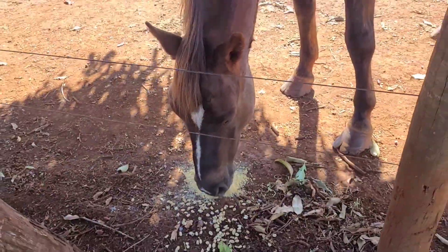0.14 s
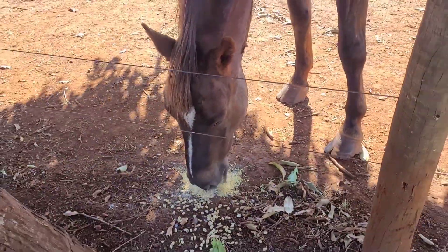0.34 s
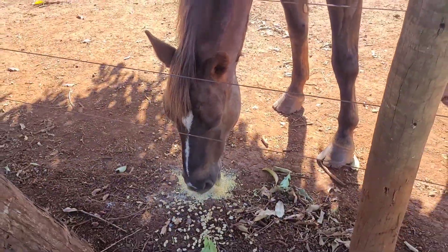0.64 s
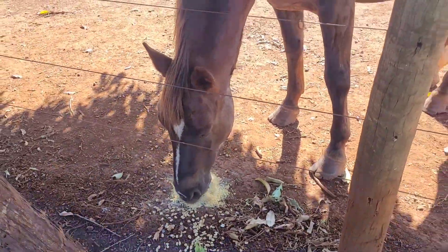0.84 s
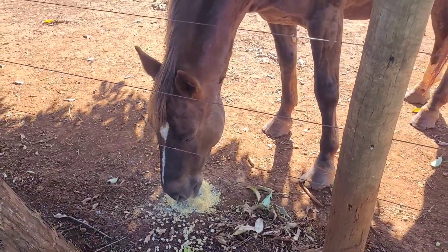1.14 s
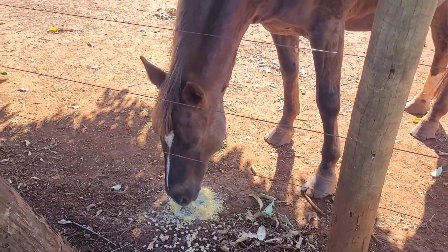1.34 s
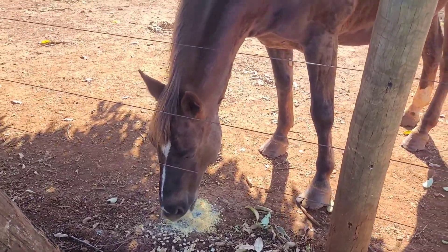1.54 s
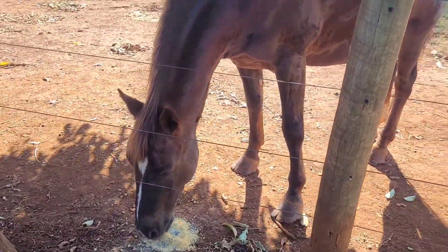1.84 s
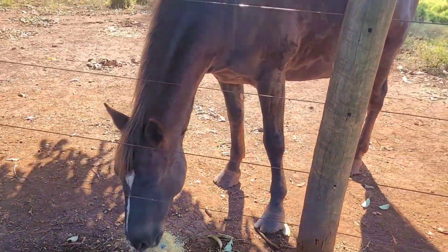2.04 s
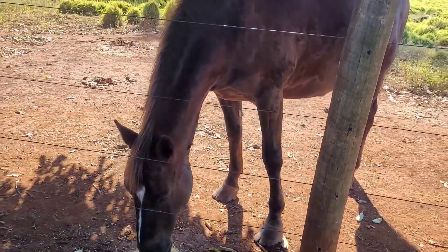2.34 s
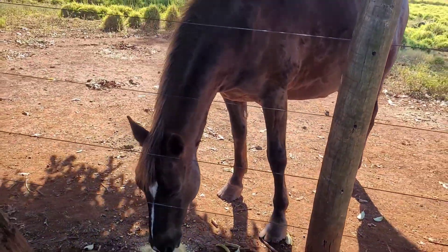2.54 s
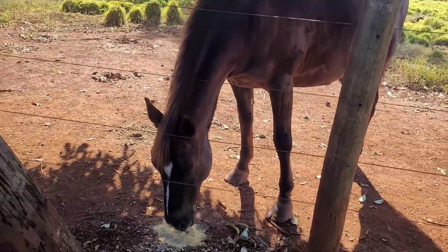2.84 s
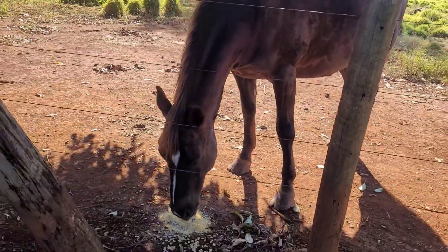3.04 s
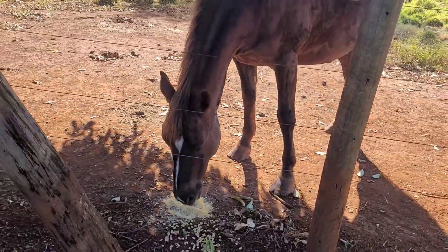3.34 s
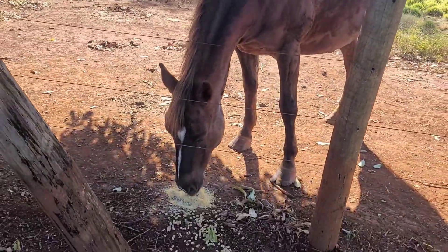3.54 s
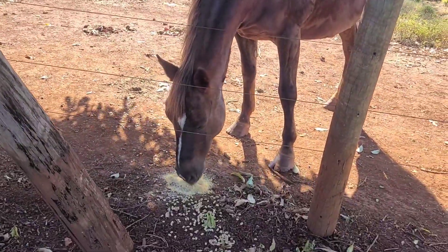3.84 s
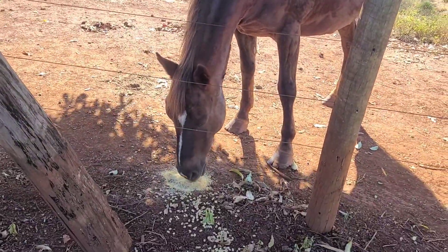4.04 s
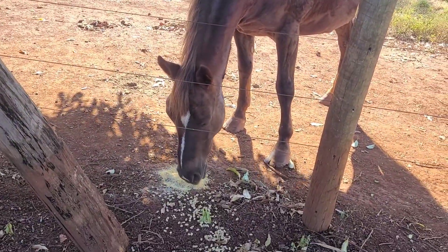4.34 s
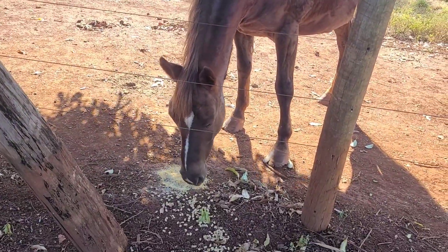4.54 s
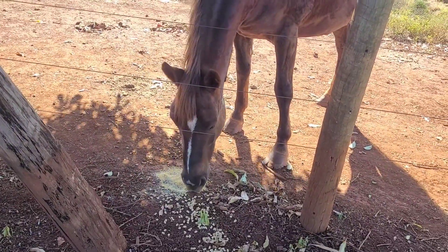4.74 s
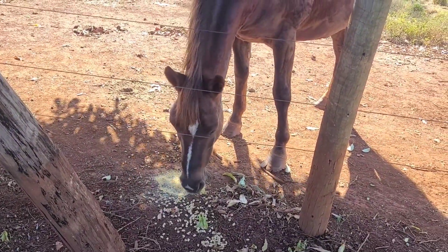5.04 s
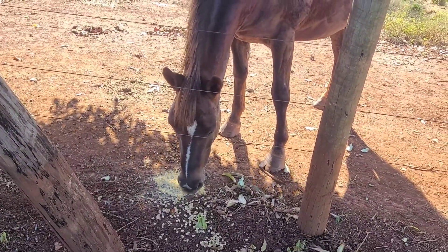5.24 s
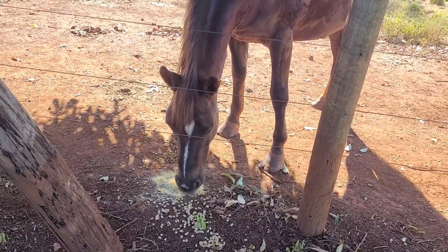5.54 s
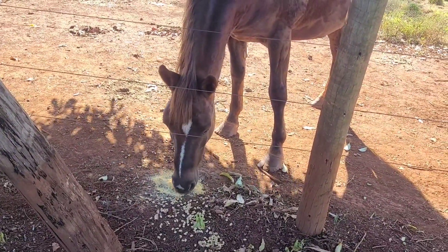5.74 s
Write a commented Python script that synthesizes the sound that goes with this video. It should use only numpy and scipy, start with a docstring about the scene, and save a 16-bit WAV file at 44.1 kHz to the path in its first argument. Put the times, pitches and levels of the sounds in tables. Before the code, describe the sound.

An open-air stereo scene with wind blowing right across the microphone. Low rumble, flutter and short thumps come unevenly, heavier on the left: a hard slap at about 0.16 s, strong buffets around 0.3 to 0.6 s, frequent bumps until about 2.2 s, a lull near 3 s, a burst near 3.6 s, then dense buffeting from 4.6 s to the end. A few metres off, a horse grinds dried corn. A loud crack snaps at 0.16 s, a bright, gritty cluster at 0.8 to 0.9 s, another crack at 1.25 s; small crackles follow near 1.75 s, crunches at 2.6 s and a duller crack at 3.24 s, then quieter, sparser munching. Faint birds chirp early, trill softly around 1.6 to 2.1 s, chirp more at 2.9 to 3.7 s, and add rising notes on the right at 4.7 to 4.9 s and a trill at 5.2 s. Thin leaf hiss continues throughout, without voices.

```python
"""Wind rumbles and flutters at two microphone ports over a steady distant hiss of leaves; a horse, a few metres
off, gathers dried corn from dusty ground and cracks it between its teeth, while birds call now and then.
Wind is shaped noise, nearly separate in each port, with short damped swings for eddies; leaves are partly
correlated noise. Grinding is dense random clicks, cracks are struck modes, and bird calls are gliding sines.
Small delays between the ports place the horse and birds; random tails scatter the cracks and echo the calls."""
import sys
import numpy as np
from scipy import signal
from scipy.fft import rfft, irfft, next_fast_len
from scipy.io import wavfile
from scipy.ndimage import uniform_filter1d, map_coordinates

SR = 44100
rng = np.random.default_rng(int(sys.argv[2]) if len(sys.argv) > 2 else 0)


def store_wav(level_fs):
    """Save 16-bit WAV to argv[1]."""
    pcm = np.round(np.clip(np.atleast_2d(level_fs), -1, 1) * 32767)
    wavfile.write(sys.argv[1], SR, pcm.T.astype(np.int16))


N = 259749
PADDED = next_fast_len(N)

# All levels are relative; "pan" is left minus right port.
# Wind rumble beneath the buffets, rising and sinking: [t/s, level/dB]
RUMBLE_LEVEL = [(0.0, -44.5), (0.34, -32.5), (0.89, -33), (1.18, -33), (1.35, -38), (1.69, -33), (3.2, -48),
                (3.71, -35), (3.9, -38.5), (4.17, -41.5), (4.77, -29), (5.12, -38.5), (5.48, -31),
                (5.89, -59)]
# Wind flutter above 140 Hz: [t/s, level/dB, pan/dB]
FLUTTER_LEVEL = [(0.0, -43, 16.5), (0.13, -46.5, -1), (0.16, -27.5, -13), (0.2, -31.5, 0.5),
                 (0.8, -40.5, 4.5), (1.61, -38.5, -0.5), (1.66, -28, 2.5), (1.84, -46.5, 1),
                 (1.97, -30, 2.0), (2.33, -51.5, 4.5), (2.74, -52.5, -11), (2.94, -63.5, -3),
                 (3.46, -60, -4), (3.56, -26, -5.5), (3.59, -40, -5), (3.76, -37.5, -4.5), (3.8, -48.5, 5),
                 (4.45, -46.5, -3), (4.76, -36, -1.5), (5.02, -37, 2.5), (5.05, -45, 7.5), (5.32, -29, 1),
                 (5.77, -35, 3), (5.89, -52, 10)]
# Buffets that swell the wind: [peak t/s, peak level/dB, half width/s, pan/dB]
BUFFETS = [(.05, -38.5, 0.035, 21), (.18, -30.5, 0.032, 0), (0.34, -18.5, 0.026, 8.5),
           (0.552, -13.5, 0.0097, -5), (0.631, -21.5, 0.016, 13), (.803, -37, 0.063, -5),
           (.958, -27, 0.016, 10), (1.05, -26.5, 0.054, 3), (1.177, -23.5, 0.085, 5.5),
           (1.28, -28.5, 0.063, 10), (1.556, -28.5, 0.065, 5), (1.646, -27.5, 0.034, 13),
           (1.74, -22.5, 0.02, 2), (1.85, -28.5, 0.037, 11), (1.964, -17.5, 0.032, 1),
           (2.065, -34, 0.019, 7), (2.145, -26.5, 0.024, 7), (2.395, -34, 0.013, -5),
           (2.544, -32.5, 0.058, 16), (2.674, -28, 0.095, 4), (2.844, -29, 0.011, 0),
           (3.043, -37.5, 0.021, -5), (3.258, -29, 0.042, 6), (3.558, -32.5, 0.08, 15),
           (3.712, -20, 0.01, -2), (4.082, -24, 0.013, -11.5), (4.171, -29, 0.037, 0),
           (4.345, -27.5, 0.018, 9.5), (4.608, -22, 0.017, -4), (4.7, -19.5, 0.011, -5),
           (4.894, -27, 0.017, 18), (5.002, -23, 0.016, 3.5), (5.102, -27.5, 0.033, 2),
           (5.201, -29.5, 0.012, 24), (5.278, -24.5, 0.012, 15), (5.378, -24, 0.027, 12),
           (5.517, -20.5, 0.038, 10), (5.69, -23, 0.043, 2.5), (5.82, -30, 0.031, 23.5)]
# Spectra of wind rumble and wind flutter: [f/Hz, level/dB per Hz]
RUMBLE_SPECTRUM = [(8.8, -11), (15, -59), (43, 5.5), (59, 6.5), (151, -3), (183, -13), (200, -10.5),
                   (260, -41), (440, -120)]
FLUTTER_SPECTRUM = [(71, -57), (120, -17), (155, 2), (187, -7), (248, 1), (577, -26), (1000, -48),
                    (1300, -53), (2200, -120)]
GUST_PAN_DB = 10  # the left port is the windward one
BUFFET_FLUTTER_DB = -15.5  # flutter that a buffet brings along
WIND_SHARED = 0.51  # amplitude of the noise common to both ports, against 1 for each port's own

# Spectrum of distant leaves: [f/Hz, level/dB per Hz]
LEAVES_SPECTRUM = [(180, -50), (300, -11), (355, -15.5), (522, -19), (970, -17.5), (2440, -17.5),
                   (4240, -13.5), (5640, -17), (7380, -15.5), (9330, -27.5), (12600, -28.5), (13700, -38),
                   (15400, -40), (16500, -67)]
# Likeness of the leaf hiss in the two ports: [f/Hz, correlation/1]
LEAVES_CORRELATION = [(300, .6), (600, .4), (900, .15), (1300, -.15), (2000, -.08), (3000, .05), (6000, .0)]
# Balance of the leaf hiss: [f/Hz, pan/dB]
LEAVES_PAN = [(300, -4.5), (700, -3.5), (1300, 2), (2400, -0.8), (4400, 2.5), (6500, -3.5), (9000, -0.8),
              (15000, -1)]
LEAVES_DB = -50.5

# Strokes of the teeth: [peak t/s, rise/s, fall/s, grit level/dB, crunch level/dB, fizz minus grit/dB]
STROKES = [(.02, 0.0089, 0.21, -63, -62, 1), (.148, 0.16, 0.14, -47.5, -46.5, -5),
           (.32, 0.2, 0.1, -53.5, -50, -3), (.54, 0.035, 0.18, -63, -52, 0), (.68, 0.1, .12, -62.5, -58, 0),
           (0.803, 0.0071, 0.026, -39, -55, -4), (.816, 0.0092, 0.011, -33.5, -38.5, -4),
           (.84, 0.062, 0.04, -44, -45.5, -14), (0.856, 0.0074, 0.037, -37.5, -51, -7),
           (.88, 0.022, 0.01, -39, -55, -7), (.895, .01, 0.069, -50, -50.5, 2),
           (.945, 0.012, .2, -51, -67, -3), (1.076, .1, 0.05, -57, -48, 1),
           (1.19, 0.17, 0.093, -54.5, -54, -12), (1.28, 0.059, 0.086, -49.5, -49.5, -7),
           (1.355, 0.093, 0.036, -45.5, -52.5, -11.5), (1.53, 0.059, 0.16, -60, -54.5, -4),
           (1.63, 0.011, .25, -49.5, -48.5, -5), (1.864, 0.036, 0.9, -51.5, -54.5, -10),
           (2.048, .1, 0.092, -62, -68, -3), (2.248, 0.14, 0.098, -71, -69, -5),
           (2.388, 0.025, 0.044, -61, -71, -5), (2.57, .015, 0.11, -52.5, -50, 1.5),
           (2.625, .04, 0.092, -57, -47, 1), (2.785, .02, 0.024, -48.5, -50, -18),
           (2.855, 0.11, .06, -57, -57.5, -4), (2.944, 0.018, 0.12, -59, -60, 4),
           (3.24, .004, .03, -53, -43.5, -18), (3.32, .08, 0.22, -62, -55, -5),
           (3.6, 0.19, .09, -55.5, -62, -19), (3.7, 0.012, 0.035, -51.5, -71, -28),
           (3.89, 0.018, .06, -57, -64, -11), (4.6, 0.023, 0.021, -57, -65, -22),
           (4.81, 0.14, 0.6, -56.5, -57, -12), (5.52, 0.85, 0.87, -56.5, -58, -16),
           (5.77, .04, 0.12, -58, -58, -6.5)]
# Spectra of splintering grit, its finest fizz and duller crunch: [f/Hz, level/dB per Hz]
GRIT_SPECTRUM = [(1650, -54), (2800, -5.5), (3380, 6.5), (3890, 5.5), (4960, 7), (5620, 4), (6120, 1),
                 (7100, 4.5), (9200, -5.5), (12000, -38), (20200, -120)]
FIZZ_SPECTRUM = [(5290, -41), (9000, -14), (10600, 2.5), (11800, 1), (13400, -2.5), (16000, -8.5)]
CRUNCH_SPECTRUM = [(240, -52), (400, -1.5), (604, -9), (738, -8), (1850, -9.5), (3110, -8), (5000, -31),
                   (6500, -58), (11000, -120)]
# The microphone swings round towards the horse: [t/s, delay of the left port/ms]
HORSE_LAG = [(0, .15), (1.9, .14), (2.55, .05), (3.2, .02), (5.89, 0)]
STROKE_DROP_DB = 12  # lost over a rise or a fall time
MUNCH_DB = -69.5  # dull crunch that never quite stops

# Kernels cracking: [t/s, peak level/dB, strongest f/Hz, loss away from it/dB per octave]
CRACKS = [(.048, -37.5, 3500, 5.5), (0.135, -29, 3800, 29), (.161, -11, 2650, 21.5), (.33, -29.5, 1120, 8),
          (.465, -48, 13000, 20), (.562, -38, 12500, 6), (0.639, -50, 13500, 14), (.667, -52, 13500, 9),
          (.802, -32, 5500, 6), (.818, -16.5, 3970, 20), (0.853, -27.5, 5100, 4.5), (.872, -39, 4000, 5),
          (0.882, -20.5, 6760, 13), (.942, -37.5, 6500, 2), (.97, -31.5, 6600, 5), (.995, -29.5, 8300, 9),
          (1.081, -42, 9000, 5), (1.246, -26, 3060, 31), (1.627, -42, 1710, 7), (1.736, -41, 6000, 9),
          (1.758, -33.5, 6500, 12), (1.776, -42, 8000, 5), (1.836, -43, 7500, 4), (1.859, -36, 7000, 13),
          (1.876, -38, 8000, 5), (2.027, -40, 9000, 5), (2.048, -46, 6500, 1), (2.32, -47, 12000, 0.5),
          (2.405, -40, 6000, 14), (2.563, -39, 3000, 4), (2.566, -34.5, 930, 13), (2.598, -36, 1500, 4),
          (2.62, -35, 1800, 5), (2.624, -34, 1100, 8), (2.639, -39, 2000, 9), (2.659, -39.5, 1800, 12),
          (2.771, -37.5, 4000, 3.5), (2.778, -34, 1100, 4), (2.856, -45, 1100, 9), (3.239, -27, 1010, 6),
          (3.248, -29.5, 1500, 10), (3.321, -53, 800, 0), (3.364, -41, 1790, 4), (4.798, -37.5, 2300, 6),
          (5.155, -37, 2640, 40), (5.543, -35, 900, 5.5), (5.812, -37.5, 1990, 7.5)]
# Modes of a cracking kernel: [f/Hz, level/dB, decay time t60/s]
KERNEL_MODES = [(604, 5, 0.016), (927, 1.5, 0.0089), (1120, -11.5, 0.018), (1260, 3.5, 0.0092),
                (1580, 12, 0.0027), (2120, 7.5, 0.0072), (2520, -2.5, 0.0036), (3220, 9, 0.0019),
                (3640, 9, 0.0027), (4190, 9, 0.0071), (5900, 5, 0.0043), (7550, 12, 0.0022),
                (11300, 7, 0.0053), (12700, 7, 0.0028)]
# Rough ground and legs scatter each crack: [delay/s, level/dB per ms]
GROUND_SCATTER = [(.0002, 10), (.002, -13.5), (.012, -22)]
CRACK_CHANCE_DB = 2.2  # spread of a mode's strength from crack to crack

# Single eddies that slap a port: [t/s, peak level/dB, f/Hz, pan/dB]
SLAPS = [(0.163, -2, 230, 1), (0.31, -16, 323, -6), (0.382, -16, 251, -2), (0.537, -14.5, 136, 0),
         (0.826, -18, 197, -2), (1.312, -16.5, 147, 1), (1.573, -15.5, 123, 2), (1.652, -16.5, 112, 4),
         (1.972, -19, 185, 2), (2.053, -18.5, 163, 9.5), (2.137, -21.5, 104, -19.5),
         (3.506, -33, 122.6, 13), (3.544, -16.5, 143, 11.5), (3.661, -21, 149, 13), (4.602, -14, 260, 3.5),
         (4.702, -16.5, 205, 6), (4.891, -13, 120, 9.5), (4.949, -21, 131, -8), (4.99, -22.5, 115, -9),
         (5.263, -11, 140, -6.5), (5.316, -15.5, 140, -6), (5.395, -15.5, 164, -6), (5.513, -9.5, 207, 3),
         (5.621, -19.5, 115, 12), (5.777, -27.5, 110, 23)]

# Chirps of the birds ahead, and distinct echoes of the first two:
# [start t/s, length/s, first f/Hz, middle f/Hz, last f/Hz, level/dB]
CHIRPS = [(.268, .036, 2400, 2130, 1850, -45), (.312, .022, 2050, 2050, 1950, -50),
          (.543, .045, 2900, 2280, 1850, -48), (.595, .022, 2150, 2080, 1950, -51),
          (.885, .07, 2850, 1950, 1650, -54), (2.383, .017, 6050, 6100, 6200, -49),
          (2.445, .05, 5850, 5880, 5900, -50), (2.87, .07, 3450, 3030, 2920, -48),
          (3.015, .08, 4300, 3500, 2840, -49), (3.098, .08, 3330, 3580, 3580, -46),
          (3.105, .024, 7150, 7220, 7050, -50), (3.31, .075, 3200, 3700, 3680, -48),
          (3.575, .027, 3150, 3400, 3300, -41), (3.6, .055, 3300, 2720, 2570, -44),
          (3.695, .02, 4800, 4650, 4640, -54), (4.595, .07, 4200, 3650, 2800, -46),
          (5.152, .045, 3450, 3250, 2950, -49), (5.21, .07, 3350, 3300, 3150, -53),
          (5.58, .02, 4800, 4800, 4770, -56), (5.612, .024, 4850, 4800, 4750, -58)]
# Rising notes of a lower bird off to the right: same columns as the chirps
NOTES = [(4.655, .05, 1420, 1510, 1550, -51), (4.705, .04, 1760, 1760, 1780, -48),
         (4.81, .075, 1750, 1850, 1900, -46), (4.878, .025, 1950, 2070, 2070, -40),
         (4.94, .018, 2050, 2050, 2050, -44)]
# Trills: the chirp columns, then [pitch swing/share of middle f, beat rate/Hz, t of a beat/s,
# throb level/dB, delay of the left port/ms]
TRILLS = [(1.55, .6, 1930, 2020, 1930, -49.5, .075, 13.7, 1.722, 8, .2),
          (4.18, .22, 1454, 1445, 1450, -61, .045, 27, 4.195, 6, .25),
          (5.195, .33, 3050, 2580, 2150, -47, .055, 22.5, 5.278, 7, 0)]
# Sheds and trees send the calls back as a blur: [delay/s, level/dB per ms]
ECHOES = [(.003, -20), (.025, -20), (.046, -21), (.058, -27), (.1, -36), (.2, -48)]
ECHO_CUT_HZ = 4800  # the long way round dulls the treble
RIGHT_LAG_MS = 0.22  # delay of the left port for the notes
CHIRP_PEAK = 0.3  # a call is loudest at this share of its length
CHIRP_START_DB, CHIRP_END_DB, TRILL_END_DB = -6, -7, -11  # trills fade further than chirps
WAVER_HZ, THROB_DB = 60, 2.5  # random spread of pitch and level in chirps and notes
TRILL_WAVER, TRILL_THROB_DB = 0.6, 2.5  # random pitch as a share of the swing, and random level

CUTOFF_HZ = 16900


def from_db(db):
    """Logarithmic level: the amplitude gain of a level in dB."""
    return 10 ** (np.asarray(db) / 20)


def rms_one(x):
    """Power normalisation: scale to rms 1."""
    return x / np.sqrt(np.mean(x ** 2) + 1e-20)


def in_time(rows):
    """Linear interpolation: every column of a time table, sample by sample."""
    t, *columns = np.transpose(rows)
    return [np.interp(np.arange(N) / SR, t, column) for column in columns]


def at_hz(points):
    """Interpolation over log frequency: a (f/Hz, value) table at every frequency bin."""
    hz = np.fft.rfftfreq(PADDED, 1 / SR) + 1
    table_hz, values = np.transpose(points)
    return np.interp(np.log(hz), np.log(table_hz), values)


def drift(rate):
    """Low-passed noise: slow chance of spread 1, from two equal poles at rate/Hz."""
    # one value per 20 samples; the first 2000 let the filter settle
    pole = np.exp(-2 * np.pi * rate * 20 / SR)
    noise = rng.standard_normal(N // 20 + 2002)
    slow = signal.lfilter([1], [1, -2 * pole, pole * pole], noise)[2000:]
    return np.interp(np.arange(N) / 20, np.arange(len(slow)), rms_one(slow))


def colour(x, spectrum):
    """Spectral shaping: multiply white input by a table of levels; rms 1."""
    shaped = rfft(x, PADDED) * from_db(at_hz(spectrum))
    return rms_one(irfft(shaped, PADDED)[..., :N])


def ports(x, lag):
    """Time difference of arrival: one sound reaches both ports, the left one later."""
    positions = np.arange(N) - in_time(lag)[0] * SR / 1000
    late = map_coordinates(x, [positions], order=3)
    return np.array([late, x])


def blur(x, echoes):
    """Diffuse reflection: convolution with dense random echoes, unrelated in the two ports."""
    delay_s, db = np.transpose(echoes)
    t = np.arange(int(delay_s[-1] * SR)) / SR
    envelope = from_db(np.interp(t, delay_s, db, left=-99))
    tail = envelope * rng.standard_normal((2, len(t))) / np.sqrt(SR / 1000)
    return signal.fftconvolve(x[None], tail, axes=1)[:, :N]


def even(x, window_s, share):
    """Partial gain compression: flatten a share of the slow chance swells of a noise."""
    window = int(window_s * SR)
    power = uniform_filter1d(uniform_filter1d(x ** 2, window), window)
    return rms_one(x / (power + 0.074) ** (np.clip(share, 0, 1) / 2))


def wind(lumps_db, both_db):
    """Turbulent pressure, mostly unrelated in the two ports; its lumps swell rumble and flutter together."""
    (rumble_db,), (flutter_db, flutter_pan_db) = in_time(RUMBLE_LEVEL), in_time(FLUTTER_LEVEL)
    shared = WIND_SHARED * rng.standard_normal((2, N))
    t = np.arange(0, N, 32) / SR
    out = []
    for side in (0.5, -0.5):  # left, right
        # doubled dB: from_db then gives power
        power = sum(from_db(2 * (db + side * pan_db) - 12 * ((t - peak_s) / width_s) ** 2)
                    for peak_s, db, width_s, pan_db in BUFFETS)
        buffet_power = np.interp(np.arange(N) / SR, t, power)
        rumble_power = buffet_power + from_db(2 * (rumble_db + side * GUST_PAN_DB))
        flutter_power = (buffet_power * from_db(2 * BUFFET_FLUTTER_DB)
                         + from_db(2 * (flutter_db + 2 + side * flutter_pan_db)))

        lump_db = lumps_db * drift(26.7)
        rumble = colour(rng.standard_normal(N) + shared[0], RUMBLE_SPECTRUM) * from_db(lump_db)
        flutter = colour(rng.standard_normal(N) + shared[1], FLUTTER_SPECTRUM)
        flutter = flutter * from_db(1.94 * lump_db + 2.97 * drift(42.5))
        rumble = even(rumble, 0.086, share=0.27) * np.sqrt(rumble_power)
        flutter = even(flutter, 0.027, share=0.56) * np.sqrt(flutter_power)
        out.append(from_db(both_db) * (rumble + flutter))
    return np.array(out)


def leaves():
    """Diffuse-field coherence: far hiss from all around, most alike in the two ports in the bass."""
    alike = np.clip(at_hz(LEAVES_CORRELATION), -1, 1)
    mid, side = rfft(rng.standard_normal((2, PADDED)))
    signs = np.array([[1], [-1]])
    # sum and difference weights that give the correlation wanted
    pair = np.sqrt(1 + alike) * mid + signs * np.sqrt(1 - alike) * side
    pair = pair * from_db(signs * at_hz(LEAVES_PAN) / 2)
    hiss = colour(irfft(pair, PADDED), LEAVES_SPECTRUM)
    return from_db(LEAVES_DB + 0.9 * drift(2.5)) * hiss


def swell(peak_s, rise_s, fall_s, drop_db):
    """Exponential growth and decay: a gain that climbs to 1 and dies away, steadily in dB."""
    t = np.arange(N) / SR - peak_s
    return from_db(-drop_db * np.maximum(-t / max(rise_s, 0.002), t / max(fall_s, 0.002)))


def grains(per_s, spread_db):
    """Shot noise: random clicks of very uneven size and either sign."""
    sizes = from_db(spread_db * np.minimum(rng.exponential(1, N), 5)) * rng.choice([-1, 1], N)
    return sizes * (rng.random(N) < per_s / SR)


def grinding(scatter):
    """Dense fracture as shot noise; what scatters off the ground is unrelated in the two ports."""
    power = np.zeros((3, N))  # grit, fizz, crunch
    power[2] = from_db(2 * MUNCH_DB)
    for peak_s, rise_s, fall_s, grit_db, crunch_db, fizz_db in STROKES:
        peaks = from_db([[grit_db], [grit_db + fizz_db], [crunch_db]])
        power += (peaks * swell(peak_s, rise_s, fall_s, STROKE_DROP_DB)) ** 2
    grit, fizz, crunch = np.sqrt(power)
    sputter = from_db(1.5 * drift(52))
    ways = []
    for _ in range(3):  # direct, then scattered to the left and right ports
        splinters = grains(4000, 3.0) * sputter
        coarse = grains(900, 2.5) * sputter
        ways.append(grit * colour(splinters, GRIT_SPECTRUM)
                    + fizz * colour(splinters, FIZZ_SPECTRUM)
                    + crunch * colour(coarse, CRUNCH_SPECTRUM))
    return ports(ways[0], HORSE_LAG) + scatter * np.array(ways[1:])


def ring(clicks, hz, t60):
    """Damped resonance: a unit click sets a sine of height 1 ringing."""
    pole, angle = from_db(-60 / (t60 * SR)), 2 * np.pi * hz / SR
    return signal.lfilter([0, np.sin(angle)], [1, -2 * pole * np.cos(angle), pole * pole], clicks + 1e-18)


def cracks():
    """Modal excitation: each crack strikes all modes, hardest near its own pitch, each with some chance."""
    t, peak_db, centre_hz, loss_db = np.transpose(CRACKS)
    chance = rng.standard_normal((len(t), len(KERNEL_MODES)))
    out = np.zeros(N)
    for k, (hz, mode_db, t60) in enumerate(KERNEL_MODES):
        octaves = np.abs(np.log2(hz / centre_hz))
        strike_db = peak_db - loss_db * octaves + mode_db - 5.5 + CRACK_CHANCE_DB * chance[:, k]
        clicks = np.zeros(N)
        clicks[np.round(t * SR).astype(int)] = from_db(strike_db)
        out += (-1) ** k * ring(clicks, hz, t60)  # alternate signs
    return ports(out, HORSE_LAG) + blur(out, GROUND_SCATTER)


def slaps(turns, gain_db):
    """Vortex impact: each eddy is a few quick swings of pressure, with unrelated phase in the two ports."""
    out = np.zeros((2, N))
    phases = rng.uniform(0, 2 * np.pi, (len(SLAPS), 2))
    for (start_s, db, hz, pan_db), phase in zip(SLAPS, phases):
        start = int(start_s * SR)
        length = min(int(9 * turns / hz * SR), N - start)
        cycles = np.arange(length) / SR * hz
        shape = (cycles / turns * np.exp(1 - cycles / turns)) ** 1.1  # smooth quick rise, slower fall
        pan = from_db([[pan_db / 2], [-pan_db / 2]])
        swing = np.sin(2 * np.pi * cycles + phase[:, None]) * pan
        out[:, start:start + length] += from_db(db + gain_db) * shape * swing
    return out


def glide(start_s, length_s, first_hz, middle_hz, last_hz, db, end_db=CHIRP_END_DB):
    """Parabolic glissando: rows (t/s, f/Hz, level/dB) through three pitches, the level swelling and fading."""
    share = np.linspace(0, 1, num=21)
    bend = np.polyfit([0, 0.5, 1], [first_hz, middle_hz, last_hz], deg=2)
    level = db + np.interp(share, [0, CHIRP_PEAK, 1], [CHIRP_START_DB, 0, end_db])
    return np.transpose([start_s + share * length_s, np.polyval(bend, share), level])


def whistle(rows, bend_hz, throb):
    """Frequency and amplitude modulation: a sine along the rows, bent by some Hz and throbbing in level."""
    a, b = int(rows[0][0] * SR), int(rows[-1][0] * SR)
    hz, db = in_time(rows)[:2]
    n = np.arange(N)
    edges = np.clip(np.minimum(n - a, b - n) / (0.001 * SR), 0, 1)[a:b]  # 1 ms ramps
    level = np.sqrt(2) * (from_db(db) * throb)[a:b]  # sqrt(2): the rows give rms
    phase = 2 * np.pi * np.cumsum((hz + bend_hz)[a:b]) / SR
    out = np.zeros(N)
    out[a:b] = level * edges * np.sin(phase)
    return out


def birds(direct_db):
    """Modulated tones: calls waver, trills slide down through each loud beat; distance leaves much a blur."""
    wobble, throb, drag = drift(110), drift(35), 0.3 * drift(3)
    calls = []
    for rows, lag_ms in ((CHIRPS, 0), (NOTES, RIGHT_LAG_MS)):
        song = sum(whistle(glide(*row), WAVER_HZ * wobble, from_db(THROB_DB * throb)) for row in rows)
        calls.append((song, lag_ms))
    for *call, swing, per_s, beat_s, throb_db, lag_ms in TRILLS:
        middle_hz = call[3]
        phase = 2 * np.pi * per_s * (np.arange(N) / SR - beat_s) + drag
        bend_hz = middle_hz * swing * (TRILL_WAVER * wobble - np.sin(phase))
        beat = from_db(throb_db * np.cos(phase) + TRILL_THROB_DB * throb)
        calls.append((whistle(glide(*call, TRILL_END_DB), bend_hz, beat), lag_ms))
    direct = sum(ports(song, [(0, lag_ms)]) for song, lag_ms in calls)
    low_pass = signal.butter(2, ECHO_CUT_HZ, fs=SR, output="sos")
    dull = signal.sosfilt(low_pass, sum(song for song, _ in calls))
    return from_db(direct_db) * direct + blur(dull, ECHOES)


def scene():
    """Superposition: wind, leaves, horse and birds add; the horse is a little louder in the left port."""
    air = wind(lumps_db=4.0, both_db=-1.5) + slaps(turns=0.71, gain_db=-2.5)
    horse = (grinding(scatter=1.0) + cracks()) * from_db([[0.6], [-0.6]])
    return air + leaves() + horse + birds(direct_db=-0.54)


def record(dry):
    """Low-pass filtering: the top is cut, by at least 60 dB from CUTOFF_HZ up."""
    return signal.sosfilt(signal.cheby2(12, 60, CUTOFF_HZ, fs=SR, output="sos"), dry)


dry = scene()
out = record(dry)
store_wav(out)
```